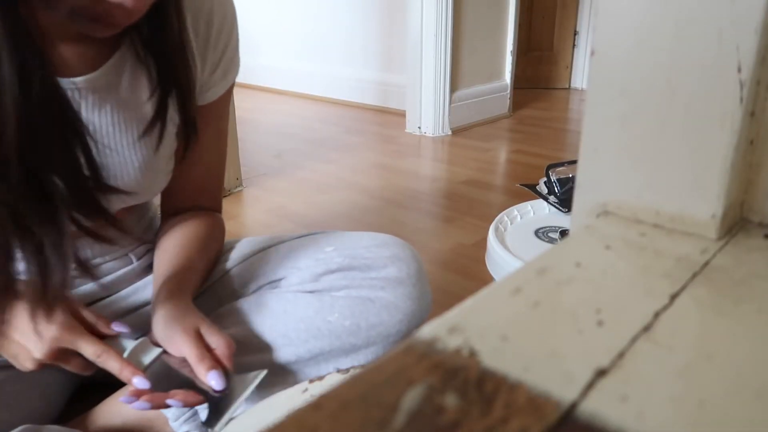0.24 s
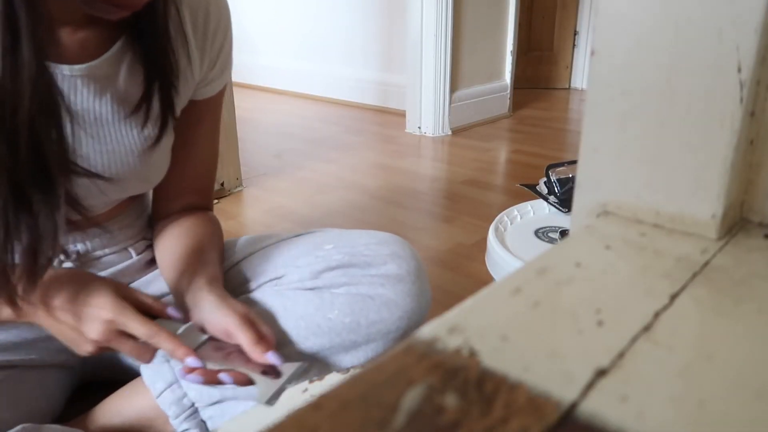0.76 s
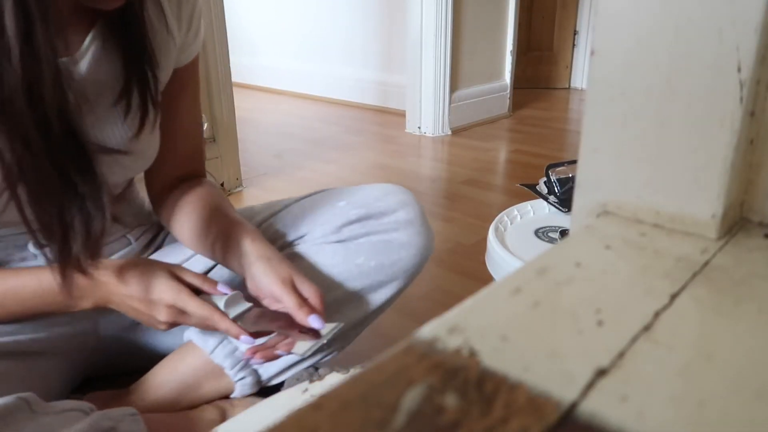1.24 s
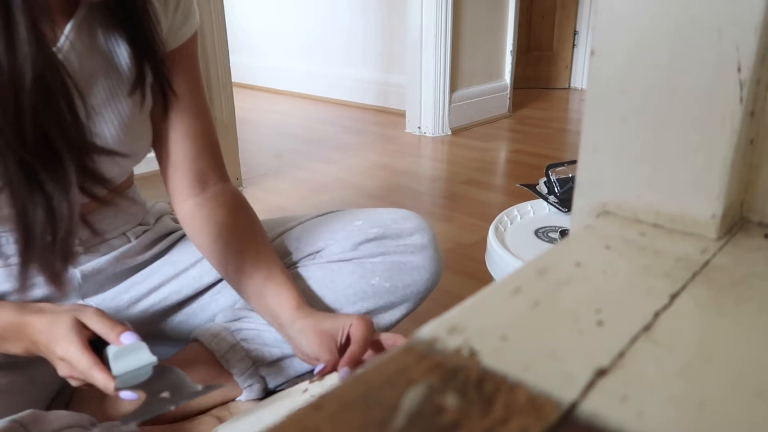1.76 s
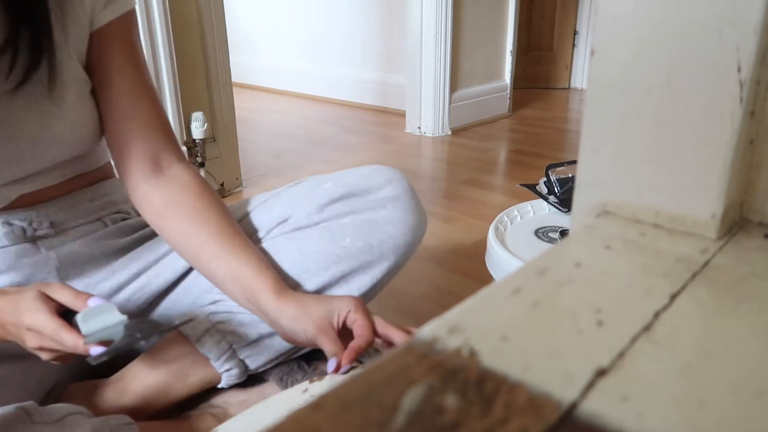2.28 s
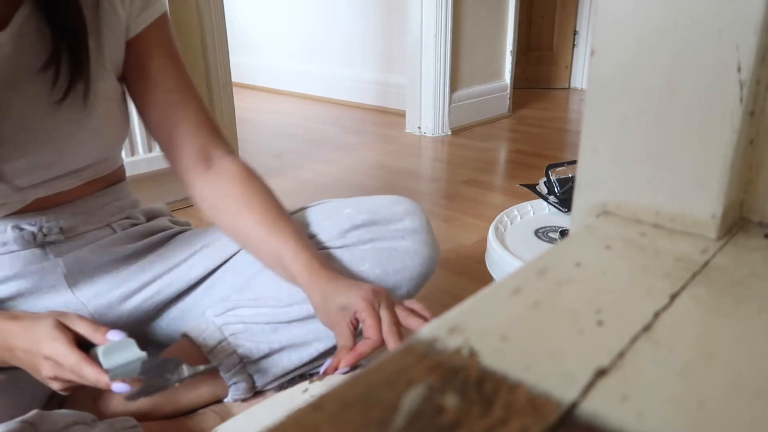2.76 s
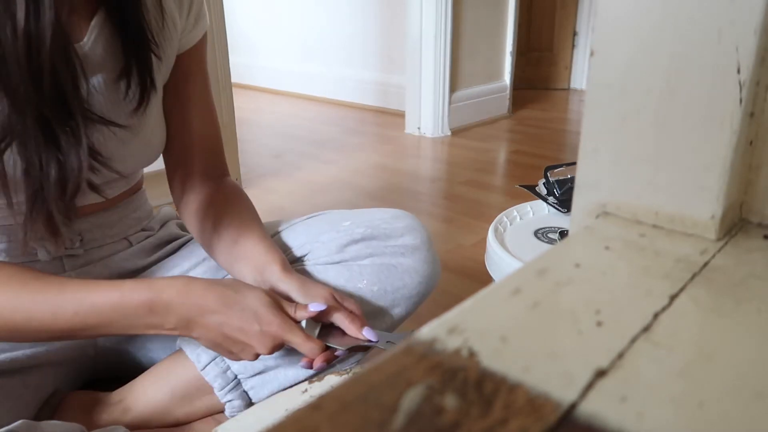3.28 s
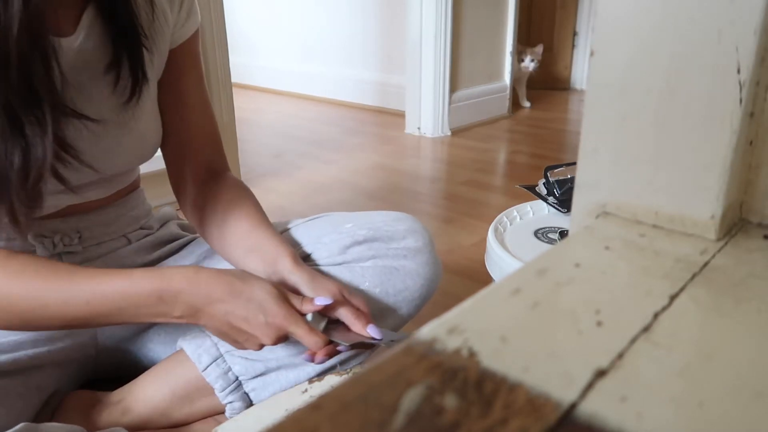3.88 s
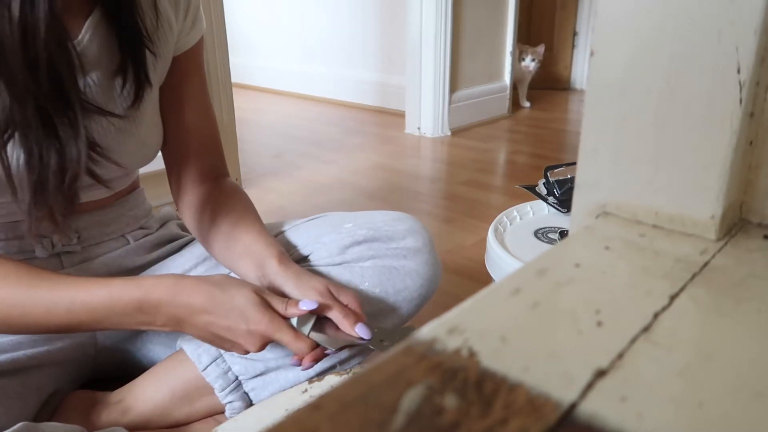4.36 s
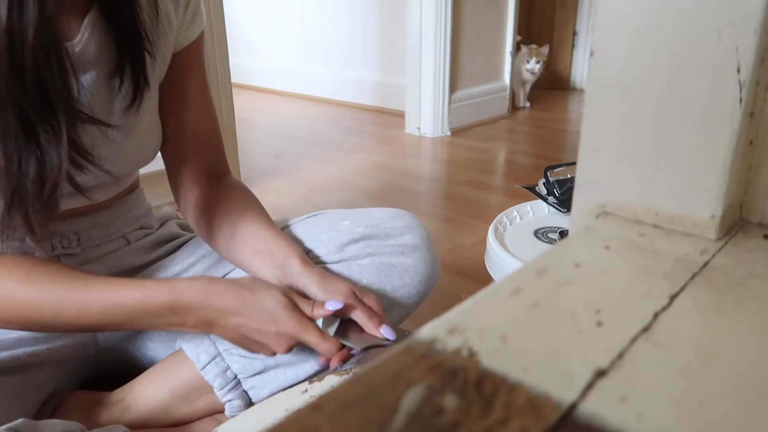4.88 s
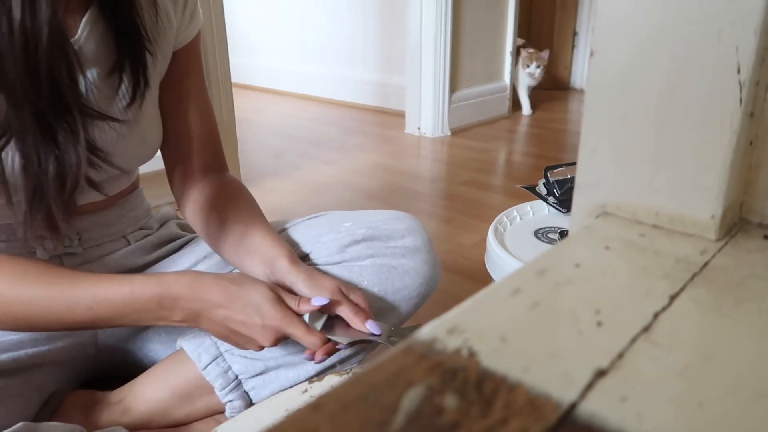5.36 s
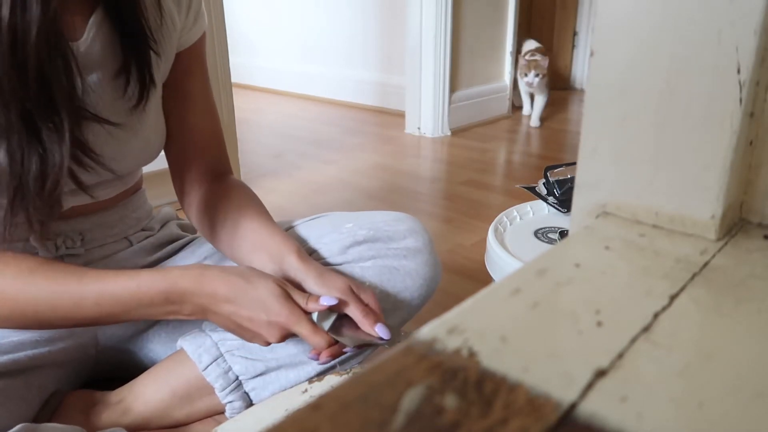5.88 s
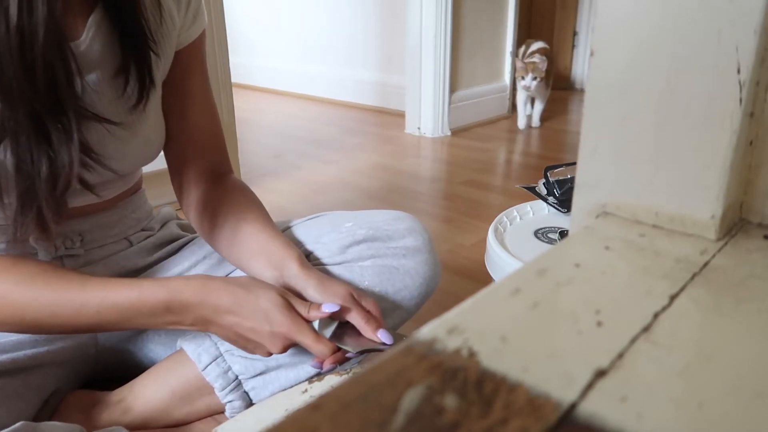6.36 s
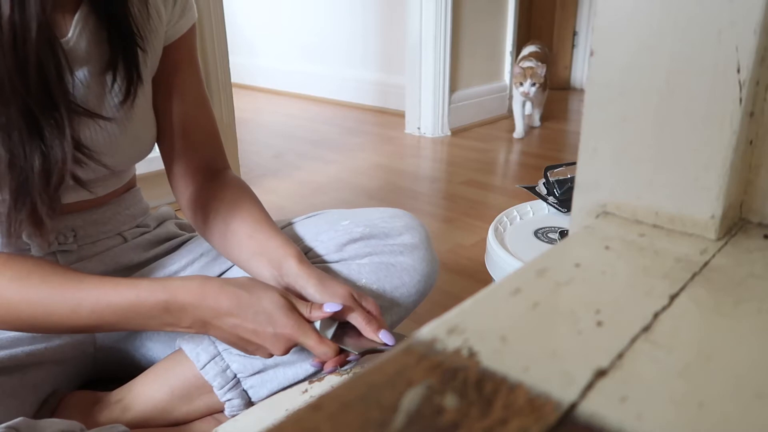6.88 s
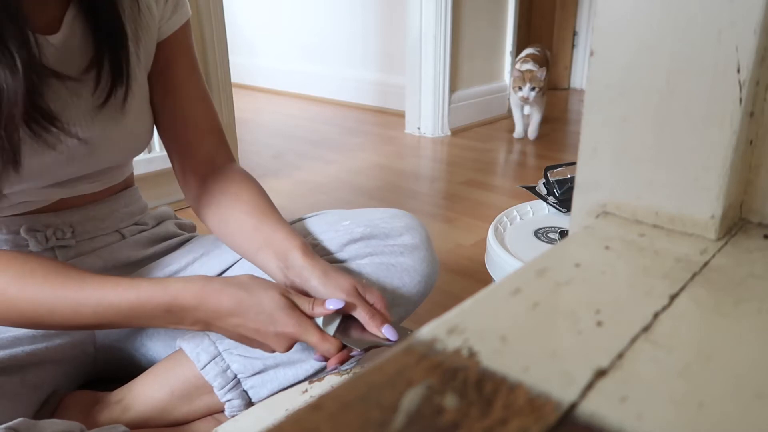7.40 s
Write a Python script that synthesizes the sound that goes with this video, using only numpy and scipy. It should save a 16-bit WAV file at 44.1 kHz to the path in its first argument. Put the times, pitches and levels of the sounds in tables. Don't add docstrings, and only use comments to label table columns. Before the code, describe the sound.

Close stereo sound in a bare hallway with a short diffuse echo and faint low hush. From 0 to 0.3 s, a small cloth swish and dull chatter of a loose hollow handle. Around 0.8 s, a soft clack and tick; at 1.08 s, a clear light tap on wood. Then quiet sleeve rustle and dry fingertip brushing until 2.9 s, when two quick scraper knocks land. Small knocks follow at 3.0-3.5 s, with a thin blade ping near 3.25. At 3.64-3.73 s comes a hard, dense burst of woody blows and gritty, juddering scraping. Handle rattle and crumbling flakes follow near 3.9-4.0 s. Lighter taps lead to another strong burst at 4.82-4.9 s, then a bright hollow clack at 5.13 s with rapid rattling. Sparse taps continue; a sharp scrape-knock hits at 6.53, another at 7.27, with flakes and a final tap by 7.6 s.

```python
import sys
import numpy as np
from scipy import signal
from scipy.fft import rfft, irfft, next_fast_len
from scipy.io import wavfile
from scipy.ndimage import map_coordinates

SR = 44100
rng = np.random.default_rng(int(sys.argv[2]) if len(sys.argv) > 2 else 0)


def makeup_ratio(level_db):
    decades = np.asarray(level_db, float) / 20
    return 10 ** decades


def unload_wav(signal):
    wavfile.write(
        sys.argv[1],
        SR,
        np.round(np.clip(np.atleast_2d(signal).T, -1, 1) * 32767).astype(np.int16),
    )


N = 336417

# frequency in Hz, level in dB, decay time t60 in seconds.
DEEP = [(61.9, -9.5, 0.64), (93.8, 4.5, 0.21), (123, -11.5, 0.38)]
TREAD = [(132, -13, 0.11), (167.8, 0, 0.12), (206.2, -5, 0.088)]
RISER = [(251.8, -1.5, 0.12), (310, 0.43, 0.084)]
SMALL = [(366.4, 2, 0.027), (463, -1.5, 0.054), (544, -6, 0.053), (565, -7.5, 0.046), (671.5, -6.5, 0.026),
         (798, -13.5, 0.036)]
BOARDS = DEEP + TREAD + RISER + SMALL
# frequency in Hz, level in dB per Hz.
CLOTH = [(180, -2.5), (300, 0.5), (700, -10.5), (3000, -14.5), (8000, -26.5), (12000, -28.5),
         (14000, -36.5), (16000, -79)]
SMEAR_HZ, TIP_SMEAR_HZ = 36, 300


def unit(x):
    return x / np.sqrt(np.mean(x ** 2) + 1e-20)


def along(points, hz):
    f, v = np.transpose(points)
    return np.interp(np.log(hz + 1), np.log(f + 1), v)


def filtered(x, response):
    m = next_fast_len(N + SR // 2)
    return irfft(rfft(x, m) * response(np.fft.rfftfreq(m, 1 / SR)), m)[..., :N]


def weighted(x, gains):
    return filtered(x, lambda hz: makeup_ratio(along(gains, hz)))


def coloured(x, spectrum):
    return unit(weighted(x, spectrum))


def banded(x, edges_hz):
    return signal.sosfilt(signal.butter(2, edges_hz, "band", fs=SR, output="sos"), x)


def ring(modes, scatter_db=0, attack=0.000094, smear_hz=0):
    t = np.arange(SR // 2) / SR
    hz, db, t60 = np.transpose(modes)[:, :, None]
    db = db + scatter_db * rng.standard_normal(hz.shape)
    sign = (-1) ** np.arange(len(hz))[:, None]
    drift = 0
    if smear_hz:
        walk = np.cumsum(rng.standard_normal((len(hz), len(t))), 1)
        drift = walk * np.sqrt(2 * np.pi * smear_hz / SR)
    decaying = sign * makeup_ratio(db - 60 * t / t60) * np.sin(2 * np.pi * hz * t + drift)
    return np.sum(decaying, 0) * (1 - np.exp(-t / attack))


def grains(spiky_db):
    size = np.minimum(rng.exponential(size=N), 5)
    return unit(rng.standard_normal(N) * makeup_ratio(spiky_db * size))


def swell(s, rise, fall, rise_db, fall_db):
    t = np.arange(N) / SR - s
    return makeup_ratio(np.where(t < 0, rise_db * t / max(rise, 1e-3), -fall_db * t / max(fall, 1e-3)))


def add(track, s, sound):
    part = track[round(s * SR):][:len(sound)]
    part += sound[:len(part)]


def knocks():
    # start in seconds, peak level in dB,
    # deep boards in dB, thin boards in dB.
    light_taps = [(0.002, -56, 9, -11), (0.348, -61, -31, 8), (0.8, -45.5, 4, 12), (0.82, -53, -27, 21.5),
                  (1.061, -52, -48, 12), (1.081, -34, -34, -2), (1.661, -68, -8, 20.5),
                  (1.778, -50, -37, -5), (2.003, -60.5, -22, 13), (2.179, -61, -3, 19), (2.446, -63, 2, -7),
                  (2.806, -55, -6.5, 3.5), (3.287, -52, -8, 1), (0.847, -49, -17, 0), (1.09, -45, -31, 8),
                  (4.075, -39, -9.5, 6.5), (7.449, -54, 11, -9), (7.555, -50.5, 2, 6),
                  (4.313, -43, -25, -9.5), (4.739, -54, 9.5, -1), (5.547, -50, 4, 11),
                  (5.846, -43.5, -51, -20), (5.961, -43, 3.5, -4), (6.2, -45, -13, -10),
                  (6.827, -41, -11.5, 0.5), (7.621, -37.5, -0.5, 7.5)]
    # start in seconds, peak level in dB, deep boards in dB,
    # riser in dB, small boards in dB.
    blows = [(2.903, -27, -15, -0.5, -0.5), (2.917, -25, -20.5, -2.5, 1.5), (3.036, -34.5, -18, -28, -7),
             (3.223, -33, -3.5, -8, -5.5), (3.255, -27.5, -16, -17, -4), (3.413, -33, 2, -9, -2.5),
             (3.452, -40, 1, -13, -10), (3.639, -20.5, -2.5, -6, -12), (3.649, -26.5, -17, -9.5, -2.5),
             (3.668, -11.5, -22, -12.5, -11), (3.679, -19, -19, -11.5, -6.5), (3.692, -21, -26.5, -2, -7),
             (3.715, -15, -26, -6.5, -15), (3.726, -19, -19, -1.5, -9), (4.059, -30, -11, -20, -6),
             (4.466, -35, -12.5, -13, -11), (4.598, -38.5, -8, -10.5, -6.5),
             (4.822, -22.5, -7.5, -12.5, -8.5), (4.83, -30, -16, -14.5, -11), (4.86, -19, -11, -21, -3),
             (4.885, -12.5, 0, -17.5, -9.5), (4.892, -16.5, -17, 0, 1.5), (4.903, -22.5, -15, -7.5, -8),
             (5.19, -25, -5, -22, -26), (5.912, -39, -10.5, -4.5, -3), (6.256, -42.5, 1.5, -5.5, 2.5),
             (6.532, -17, -11.5, -5, -6), (6.54, -17, -16.5, -16, -11.5), (7.136, -25.5, -12.5, -2, -0.5),
             (7.146, -30, -15.5, -7, 0), (7.266, -16, -13, -10, -5.5)]
    tap_riser_db = -6.5
    taps = [(s, db, deep_db, thin_db + tap_riser_db, thin_db) for s, db, deep_db, thin_db in light_taps]
    out, upper = np.zeros(N), np.zeros(N)
    t = np.arange(SR // 20) / SR
    fade = makeup_ratio(-60 * np.arange(SR // 5) / SR / 0.054)
    for s, db, deep_db, riser_db, small_db in blows + taps:
        contact_s = 0.0033 * makeup_ratio(0.4 * deep_db)
        boards = makeup_ratio(deep_db) * ring(DEEP, 0.88, attack=0.014)
        boards += ring(TREAD, 1.0, attack=0.0049)
        boards += makeup_ratio(riser_db - 1.5) * ring(RISER, 0.27, attack=0.00064)
        boards += makeup_ratio(small_db + 0.5) * ring(SMALL, 0.73, attack=0.0027)
        push = t * np.exp(-t / max(contact_s / 8, 5e-5))
        add(out, max(s - 0.004, 0), makeup_ratio(db) * signal.fftconvolve(boards, push / push.sum()))
        add(upper, s, makeup_ratio(db + small_db - 21.5) * fade * rng.standard_normal(len(fade)))
    return out + banded(upper, [445, 1240])


def rustle():
    # hardest moment in seconds, rise in seconds,
    # fall in seconds, level in dB, brightness in dB.
    swishes = [(0.003, 0.023, 0.035, -43.5, 1), (1.08, 0.015, 0.7, -52, -26), (1.251, 0.18, 0.32, -54, 8),
               (1.66, 0.031, 0.31, -58, 9), (2.25, 0.15, 0.47, -59.5, 2), (2.75, 0.13, 0.23, -77, 21),
               (3.82, 0.11, 0.061, -47.5, 0), (3.97, 0.05, 0.059, -45.5, -21), (4.3, 0.059, 0.84, -67, 0),
               (4.991, 0.045, 0.12, -42.5, 1), (5.11, 0.069, 0.29, -42, -24.5),
               (6.03, 0.13, 0.083, -72.5, 27), (6.52, 0.035, .02, -60.5, 18.5),
               (0.82, 0.016, 0.36, -50, -28), (2.92, 0.033, 0.17, -52, -30), (6.71, 0.19, 0.11, -64.5, 18),
               (7.2, 0.26, 0.23, -72.5, 15), (7.63, 0.11, .1, -59, 9)]
    # hardest moment in seconds, rise in seconds,
    # fall in seconds, level in dB.
    sweeps = [(0.05, 0.044, 0.16, -61), (0.22, 0.11, 0.087, -65), (1.25, 0.15, 0.25, -67),
              (1.7, 0.057, 0.094, -66), (2.1, 0.12, 0.21, -63), (2.27, 0.18, 0.23, -56),
              (2.55, 0.17, 0.17, -64.5), (4.48, 0.03, 0.11, -61.5), (2.75, 0.097, 0.13, -59),
              (3.12, 0.05, 0.12, -63), (3.96, 0.04, 0.18, -62), (4.62, 0.05, 0.11, -62),
              (6.03, 0.046, 0.072, -74), (6.46, 0.048, 0.062, -65.5), (7.33, 0.05, 0.13, -54)]
    # time in seconds, level in dB.
    weight = [(0, -54), (0.35, -67), (0.75, -67), (1.05, -61), (1.18, -46), (1.4, -67), (1.9, -62.5),
              (2.85, -74.5), (3.06, -50.5), (3.7, -53.5), (3.85, -41.5), (4.23, -53.5), (4.9, -50.5),
              (5.0, -38), (5.5, -54.5), (6.5, -52), (6.7, -50), (7.63, -51.5)]
    rise_db, fall_db = 12.5, 17
    still_db = -75
    soft, crisp, sweep = makeup_ratio(still_db), makeup_ratio(still_db + 13.5), 0
    for s, rise, fall, db, bright_db in swishes:
        move = swell(s, rise, fall, rise_db, fall_db)
        soft = soft + makeup_ratio(db) * move
        crisp = crisp + makeup_ratio(db + bright_db) * move
    for s, rise, fall, db in sweeps:
        sweep = sweep + makeup_ratio(db) * swell(s, rise, fall, rise_db, fall_db)
    cloth = coloured(grains(spiky_db=3.5), CLOTH)
    upper = filtered(cloth, lambda hz: hz ** 2 / (hz ** 2 + 3500 ** 2))
    centre_hz, width_hz = 2500, 1840

    def fingertip(hz):
        return (hz * width_hz / (centre_hz ** 2 - hz ** 2 + 1j * hz * width_hz)) ** 2

    skin = unit(filtered(cloth, fingertip))
    murmur = unit(signal.fftconvolve(grains(spiky_db=6.5), ring(BOARDS))[:N])
    lean_db = np.interp(np.arange(N) / SR, *np.transpose(weight))
    sleeves = makeup_ratio(-7.5) * (soft * (cloth - upper) + crisp * upper)
    return sleeves + makeup_ratio(lean_db - 7.5) * murmur + makeup_ratio(-9) * sweep * skin


def clacks():
    # hardest moment in seconds, length in seconds,
    # low modes in dB, middle modes in dB, high modes in dB.
    rattles = [
        (0.014, 0.15, -64, -47, -55.5),
        (0.879, 0.04, -60, -46.5, -66),
        (.11, 0.047, -45, -49, -58),
        (0.197, 0.1, -39, -42, -67.5),
        (3.906, 0.05, -31, -37, -58.5),
        (3.947, 0.057, -51, -30.5, -59.5),
        (4.011, 0.043, -45, -33, -59),
        (5.16, 0.043, -27, -24.5, -41),
        (5.177, 0.032, -31, -31, -53),
        (5.186, 0.022, -28, -22.5, -39.5),
    ]
    # start in seconds, peak level in dB, middle modes in dB,
    # high modes in dB.
    handle_knocks = [
        (0.798, -35.5, -9.5, -27),
        (0.845, -39.5, -7, -41),
        (3.936, -26, -14.5, -48),
        (4.011, -33.5, -13.5, -42),
        (4.396, -42.5, -26, -56),
        (5.127, -19.5, -0.5, -7),
    ]
    # frequency in Hz, level in dB, t60 in seconds.
    low_modes = [(291, 0, 0.13), (339.3, 6, 0.068)]
    middle_modes = [(685, -9.5, 0.054), (847, -5, 0.05), (970, -15.5, 0.58), (1047, -18.5, 0.29),
                    (1000, -5.5, 0.049), (1061, -3.5, 0.071), (1592, -10.5, 0.09)]
    high_modes = [(2140, -4.5, 0.14), (2580, 4, 0.028), (2630, -11.5, 0.75), (2740, -17, 0.77),
                  (2463, -14, 0.025), (2630, 7.5, 0.067), (3556, -6.5, 0.083), (3680, -20.5, 0.3),
                  (2870, -8.5, 0.092), (4000, -16, 0.099)]
    out = np.zeros(N)
    for s, db, mid_db, high_db in handle_knocks:
        shell = ring(low_modes, attack=0.0023)
        shell += makeup_ratio(mid_db + 5.0) * ring(middle_modes, attack=0.00068, smear_hz=SMEAR_HZ)
        shell += makeup_ratio(high_db) * ring(high_modes, smear_hz=SMEAR_HZ)
        add(out, s, makeup_ratio(db - 1.5) * shell)
    levels = np.zeros((3, N))
    for s, fall, *dbs in rattles:
        levels += makeup_ratio(dbs)[:, None] * swell(s, fall, fall, 25, 25)
    chatter = grains(spiky_db=7)
    groups = ring(low_modes), ring(middle_modes, smear_hz=SMEAR_HZ), ring(high_modes, smear_hz=SMEAR_HZ)
    for level, group, loss_db in zip(levels, groups, (-43, -40, -38)):
        out += signal.fftconvolve(makeup_ratio(loss_db) * level * chatter, group)[:N]
    dense = unit(banded(chatter, [550, 1900]))
    out += makeup_ratio(-19.5) * levels[1] * dense
    return out + makeup_ratio(-36.5) * levels[2] * coloured(chatter, CLOTH)


def ticks():
    # start in seconds, peak level in dB, sharp top in dB,
    # ring frequency in Hz.
    touches = [(0.2194, -47.5, -35, 2590), (3.2131, -62, -21, 2150), (3.4131, -50, -13, 2470),
               (3.6962, -34.5, -31, 3310), (3.707, -35, -24, 3330), (3.7165, -35, -26, 2280),
               (3.736, -43, -28, 2700), (3.779, -47, -22, 3160), (4.005, -46, -15, 2250),
               (4.868, -33, -14, 3500), (4.8895, -32.5, -21, 3350), (6.528, -30, -26, 2210),
               (6.5283, -28.5, -30, 2610), (3.8094, -40, -23, 2230), (3.8965, -49, -28, 2140),
               (3.9325, -34, -39, 2140), (4.2951, -55, -28, 2200), (4.312, -54.5, -17.5, 2380),
               (4.3974, -49.5, -27, 2320), (4.4653, -56, -14, 3300), (4.5994, -52.5, -24, 2690),
               (4.6154, -49, -18, 2150), (4.817, -40.5, -11.5, 2600), (5.127, -17.5, -29.5, 2580),
               (5.5443, -56, -16.5, 2070), (5.8356, -44.5, -29, 2370), (6.3076, -54.5, 10.5, 4260),
               (6.8478, -54, -24, 2560), (7.5388, -52, -6, 2380)]
    # start in seconds, peak level in dB, sharp top in dB, body in dB,
    # ring frequency in Hz.
    breaks = [(0.8, -43, -18, -14, 2140), (0.8091, -34, -39, 0.5, 2870), (1.62, -41, 4.5, -3, 2810),
              (1.7101, -44, -5, -13, 2140), (2.9023, -45.5, -30, 8, 2350), (3.2451, -33.5, -40, -32, 3420),
              (3.2602, -39.5, -3, -14, 2140), (3.637, -32, -22, -11.5, 2500), (3.67, -25.5, -27, -18, 3500),
              (3.6971, -25.5, -28.5, -17, 2250), (3.913, -30, -22, -11, 2270), (4.6603, -44.5, 6, -8, 4080),
              (4.851, -28, -8, -23, 3400), (4.8591, -20, -13.5, -27, 2500), (4.8875, -22, -24, -16, 2260),
              (5.921, -41.5, -7, -6.5, 2480), (5.9973, -39.5, -7, -43.5, 3900),
              (6.3647, -44.5, -5, -22, 4270), (6.5276, -22, -1, -9.5, 3360),
              (7.1313, -48.5, -39, 8.5, 2430), (7.2631, -27.5, -3.5, 0, 3280), (7.42, -38.5, -1, -27, 5140),
              (7.5708, -41.5, 3, -3, 2130), (7.6214, -29.5, -7, -2.5, 2700)]
    # start in seconds, level in dB.
    pings = [
        (3.248, -51.5),
        (5.126, -81.5),
    ]
    # frequency in Hz, level in dB, t60 in seconds.
    tip_modes = [(5700, -10, .12), (5900, -3, 0.6), (6150, -16.5, 0.3)]
    chips = [(s, db, top_db, body_db, -16.5, hz) for s, db, top_db, body_db, hz in breaks]
    nicks = [(s, db, top_db, -1, -8, hz) for s, db, top_db, hz in touches]
    steel, top, body = np.zeros((3, N))
    t = np.arange(SR // 20) / SR
    for s, db, top_db, body_db, ring_db, hz in chips + nicks:
        envelope = makeup_ratio(db - 60 * t / 0.025) * (1 - np.exp(-t / 0.0042))
        crack = envelope * rng.standard_normal((3, len(t)))
        mode = ring([(hz, 0, 0.013)], attack=0.00046)
        add(steel, s, makeup_ratio(db + ring_db + 12.5) * mode)
        add(steel, s, makeup_ratio(1.0) * crack[0])
        add(top, s, makeup_ratio(top_db + 3.0) * crack[1])
        add(body, s, makeup_ratio(body_db + 18) * crack[2])
    for s, db in pings:
        add(top, s, makeup_ratio(db) * ring(tip_modes, smear_hz=TIP_SMEAR_HZ))
    return banded(steel, [1400, 5200]) + banded(top, [4500, 13000]) + banded(body, [500, 1500])


def flakes():
    # start in seconds, length in seconds, level in dB.
    showers = [
        (3.113, 0.058, -58.5),
        (3.25, .06, -69),
        (3.93, 0.065, -59),
        (4.648, 0.056, -60),
        (6.304, .03, -59),
        (6.351, 0.062, -57),
        (7.402, 0.094, -57.5),
        (7.561, 0.052, -50),
    ]
    # frequency in Hz, level in dB per Hz.
    brittle = [(2000, -13), (4500, -4), (9000, -1), (13500, 14), (16000, -46.5)]
    t = np.arange(N) / SR
    density = np.zeros(N)
    for s, length, db in showers:
        density += makeup_ratio(db) * (t > s) * np.exp(-((t - s) / length) ** 2)
    return density * coloured(grains(spiky_db=3.5), brittle)


def strokes():
    # hardest moment in seconds, rise in seconds, fall in seconds,
    # grit in dB, judder in the boards in dB.
    scrapes = [(3.248, 0.045, 0.019, -48.5, -54), (3.671, 0.03, 0.088, -39.5, -25),
               (3.703, 0.052, 0.057, -37, -19), (3.922, 0.067, 0.086, -46.5, -37),
               (4.005, 0.023, 0.058, -58, -51), (4.858, 0.023, 0.049, -32.5, -25),
               (4.893, 0.043, 0.055, -33.5, -30.5), (5.837, 0.0096, 0.18, -61, -42),
               (6.535, 0.01, 0.083, -35.5, -17), (6.844, .025, 0.036, -58, -41),
               (7.264, 0.012, 0.13, -50, -27.5)]
    # frequency in Hz, level in dB per Hz.
    grit_spectrum = [(400, -33), (700, 4.5), (1000, 5), (2200, -10), (3400, -8), (7600, -9), (11000, -29.5),
                     (14000, -20.5), (16000, -96)]
    # frequency in Hz, level in dB, t60 in seconds.
    blade_modes = [(2150, 5, 0.04), (2656, 10.5, 0.034), (3335, -6, 0.054), (3790, -1, 0.0043)]
    levels = np.zeros((2, N))
    for s, rise, fall, *dbs in scrapes:
        levels += makeup_ratio(dbs)[:, None] * swell(s, rise, fall, 22, 15.5)
    grit, judder = levels
    clump = 160
    clumps = map_coordinates(rng.standard_normal(N // clump + 4), [np.arange(N) / clump])
    slips = unit(grains(spiky_db=4.5) * makeup_ratio(4 * clumps))
    blade = unit(signal.fftconvolve(slips, ring(blade_modes, smear_hz=TIP_SMEAR_HZ))[:N])
    boards = signal.fftconvolve(makeup_ratio(-39.5) * judder * grains(spiky_db=3), ring(BOARDS))[:N]
    return makeup_ratio(-4) * grit * (coloured(slips, grit_spectrum) + 0.52 * blade) + boards


def hall(x, step=8192):
    # frequency in Hz, t60 in seconds.
    decay = [(60, 0.16), (160, 0.33), (420, 0.31), (1100, 0.5), (2910, 0.45), (7680, 0.5), (13000, 0.33)]
    out = np.zeros((2, N + step + SR))
    for start in range(0, N, step):
        hz, t, z = signal.stft(rng.standard_normal((2, SR * 3 // 4)), SR, nperseg=256)
        fade = makeup_ratio(-60 * t / along(decay, hz)[:, None])
        tail = signal.istft(z * fade, SR, nperseg=256)[1]
        wet = signal.fftconvolve(x[None, start:start + step], tail / np.linalg.norm(tail[0]), axes=1)
        out[:, start + 130:][:, :wet.shape[1]] += wet
    return out[:, :N]


def scene():
    # frequency in Hz, gain in dB.
    sum_gain = [(3500, 1.5), (6000, -4.5), (8500, -11), (11000, -20), (14000, -25.5)]
    difference_gain = [(60, -57), (200, -28.5), (1000, -19), (2300, -16.5), (4200, -6.5), (7600, -5),
                       (12000, -9), (14500, -26)]
    # frequency in Hz, level in dB per Hz.
    hush_mid = [(15, -27.5), (25, -0.5), (36, -4.5), (77, -5.5), (187, -8), (243, -7), (479, -16.5),
                (970, -15), (1170, -15.5), (1360, -19.5), (9930, -37.5), (12900, -43.5), (16800, -85),
                (22000, -120)]
    hush_side = [(15, -55.5), (25, -49.5), (177, -1.5), (492, 0), (606, -5), (1170, -6), (1510, -7.5),
                 (5170, -16), (11600, -28.5), (12900, -28), (16800, -73.5), (22000, -120)]
    near = knocks() + rustle() + clacks() + ticks() + flakes() + strokes()
    near = signal.sosfilt(signal.butter(5, 46, "high", fs=SR, output="sos"), near)
    wet = weighted(hall(near), [(60, -5.5), (300, 2.0), (1500, -1.5), (8000, -7.0)])
    mid = weighted(makeup_ratio(-0.5) * (near + wet[0]), sum_gain)
    side = filtered(near, lambda hz: (1j + 0.15) * makeup_ratio(along(difference_gain, hz)))
    side = side + weighted(1.1 * wet[1], difference_gain)
    hiss = filtered(rng.standard_normal((2, N)), lambda hz: hz < 12900)
    mid = mid + makeup_ratio(-65.5) * coloured(hiss[0], hush_mid)
    side = side + makeup_ratio(-67) * coloured(hiss[1], hush_side)
    return np.array([mid + side, mid - side])


def low_pass(x):
    return signal.sosfilt(signal.butter(12, 14620, fs=SR, output="sos"), x)


def record(dry):
    return low_pass(dry)


dry = scene()
out = record(dry)
unload_wav(out)
```